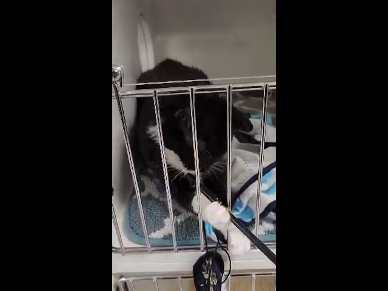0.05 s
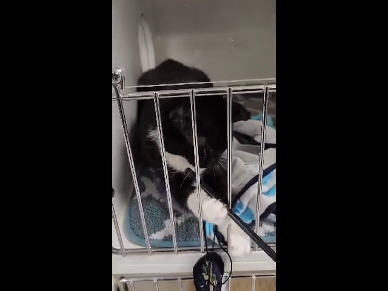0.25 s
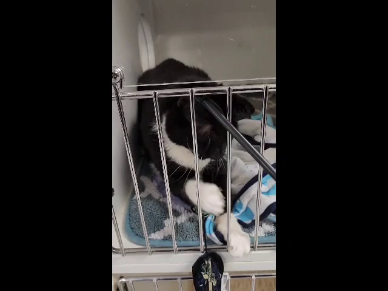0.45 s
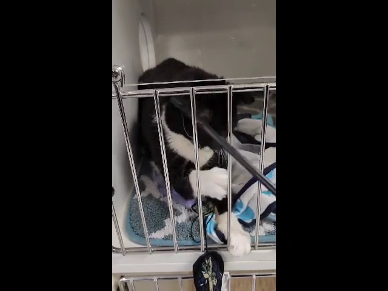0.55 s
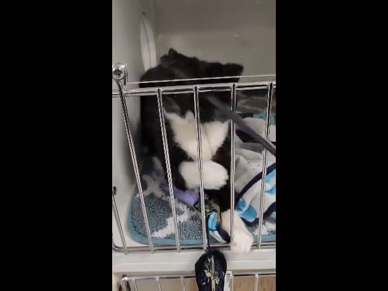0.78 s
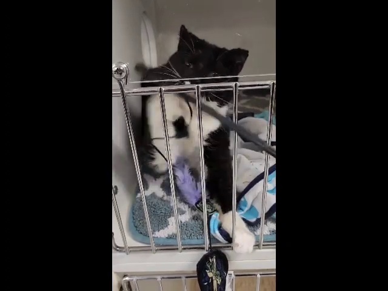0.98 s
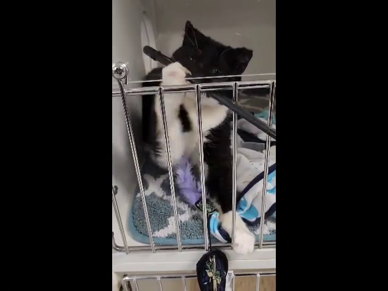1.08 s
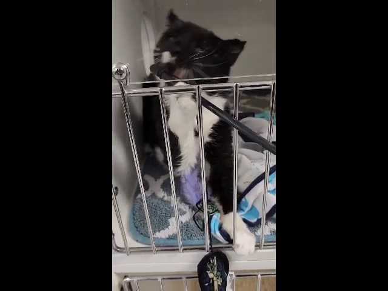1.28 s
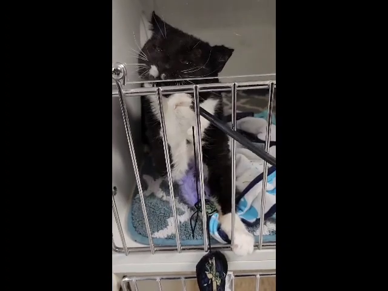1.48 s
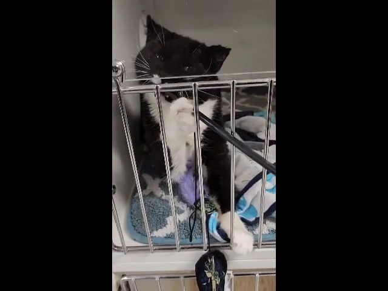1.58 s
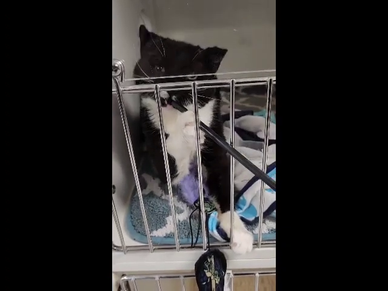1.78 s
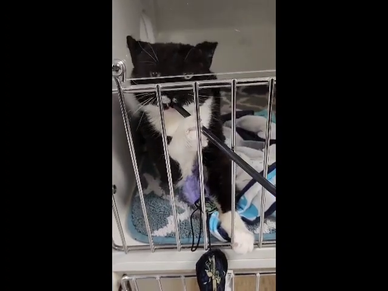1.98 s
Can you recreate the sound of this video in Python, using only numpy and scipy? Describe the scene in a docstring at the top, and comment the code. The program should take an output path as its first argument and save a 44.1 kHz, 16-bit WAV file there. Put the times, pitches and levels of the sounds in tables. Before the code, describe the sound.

Close to the microphone, wire cage bars rattle and ring as a cat tugs a plastic stick against them. The sharp knocks give way to faint rubbing and light ticks, over a steady low hum in a small room.

```python
"""A small room with a wire cat cage, the stereo microphone close to the cage door.
A cat tugs at a plastic wand that knocks against the door. Each knock is a crack, a short clatter of
the wire grid, a clack of the wand, ringing bars and a thump of the door, with the room behind it.
Soft scuffs and bites follow, over the steady low hum of ventilation."""
import sys
import numpy as np
from scipy import signal
from scipy.fft import rfft, irfft, next_fast_len
from scipy.io import wavfile

SR = 44100
rng = np.random.default_rng(int(sys.argv[2]) if len(sys.argv) > 2 else 0)


def to_wav(sig):
    """Store sig (one row per channel, or 1-D mono) as 16-bit WAV at the path in sys.argv[1].

    Samples outside -1..1 are clipped; the rate is SR.
    """
    pcm = np.clip(np.atleast_2d(sig), -1, 1) * 32767
    pcm = np.round(pcm).astype(np.int16)
    wavfile.write(sys.argv[1], SR, pcm.T)  # frames by channels


N = 90404
T = np.arange(N) / SR
FREQS = np.maximum(np.fft.rfftfreq(2 * next_fast_len(N), 1 / SR), 1)
PAN = np.array([[.5], [-.5]])  # shares a left-minus-right level between the channels
CRACK_DECAY_S = 0.0013


def undb(db):
    """Decibels to gain."""
    return 10 ** (np.asarray(db) / 20)


def curve(points, hz):
    """Read (hz, value) points on a log-frequency axis."""
    points = np.array(points, float)
    return np.interp(np.log(hz), np.log(points[:, 0]), points[:, 1])


def glide(values, position):
    """Straight lines between values spaced one step apart."""
    return np.interp(position, np.arange(len(values)), values)


def colour(x, gain_db):
    """Causal filter with a gain for each of FREQS."""
    half = len(FREQS) - 1
    cepstrum = irfft(np.log(undb(gain_db)))
    cepstrum[..., 1:half] *= 2
    cepstrum[..., half + 1:] = 0
    return irfft(rfft(x, 2 * half) * np.exp(rfft(cepstrum)))[..., :N]


def tone(low_db, mids_db, bright_db, top_db):
    """Colour of one contact against its level at 4 kHz."""
    return curve([(800, low_db), (1700, mids_db), (4000, 0), (7000, bright_db), (11000, top_db)], FREQS)


def resonance(hz, peak_db, half_width_oct):
    """One peak, in dB for each of FREQS."""
    return peak_db / (1 + (np.log2(FREQS / hz) / half_width_oct) ** 2)


def noise():
    """Unrelated white noise, left and right."""
    return rng.standard_normal((2, N))


def fade(t60_s):
    """Exponential die-away."""
    return np.exp(-np.log(1000) * T / t60_s)


def add(out, x, start_s):
    """Mix x into out from a start time."""
    i = int(max(start_s, 0) * SR)
    out[..., i:] += x[..., :N - i]


def wash(decays, bands=10, build_cycles=2.3):
    """Countless close resonances: each band of noise builds and dies at its own rate, the lows late."""
    centres, spectrum = np.geomspace(150, 15000, bands), rfft(noise())
    log_hz = np.log(np.maximum(np.fft.rfftfreq(N, 1 / SR), 1))
    out = np.zeros((2, N))
    for hz, weights in zip(centres, np.eye(bands)):
        band = irfft(spectrum * np.interp(log_hz, np.log(centres), weights), N)
        out += band * fade(curve(decays, hz)) * (1 - np.exp(-T * hz / build_cycles))
    return out


def ring(modes, scatter_db=3, detune_hz=3.61, waver_depth=0.37, waver_hz=60.55, unrelated_hz=1540):
    """Each place of contact weights the modes differently; loose parts shake, so they waver and fade."""
    out, t = np.zeros((2, N)), T[:SR]
    for hz, level_db, t60_s in modes:
        # low modes reach both channels nearly in phase
        turns = rng.random() + min(hz / unrelated_hz, 1) * rng.random((2, 1))
        size = undb(level_db + scatter_db * rng.standard_normal((2, 1))) * np.exp(2j * np.pi * turns)
        pitch_hz = hz + detune_hz * rng.uniform(-1.09, 1)
        steps = rng.standard_normal((200, 2)) @ np.array([1, 1j])
        waver = (1 + waver_depth * glide(steps, t * waver_hz)) / np.hypot(1, waver_depth)
        out[:, :SR] += (size * waver * np.exp((2j * np.pi * pitch_hz - np.log(1000) / t60_s) * t)).imag
    return out


# spectrum of the moving air: freq_hz, relative_db
AIR_COLOUR = [(12, -43.5), (20, -16.5), (59, 1.5), (84, -2.5), (108, -17.5), (151, -7), (217, -6),
              (278, -21.5), (310, -13), (337, -23), (421, -27.5), (733, -45), (914, -45.5), (1510, -52.5),
              (2160, -52.5), (4950, -66.5), (6010, -70), (7510, -64.5), (15000, -88)]
# its stereo width: freq_hz, side_minus_mid_db
AIR_WIDTH = [(30, -18), (150, -18), (300, -10.5), (600, -1), (4000, 2.5)]
# hum lines: pitch_hz, level_db
HUM_LINES = [(54, -54), (76, -54.5), (178, -56.5)]
def ventilation(air_db=-41.5, waver_depth=0.71, waver_hz=5.7):
    """Room tone: a low rush of air with wavering hum lines, nearly the same left and right."""
    mid, side = colour(noise(), curve(AIR_COLOUR, FREQS))
    side = colour(side, curve(AIR_WIDTH, FREQS))
    air = np.array([mid + side, mid - side]) * undb(air_db) / mid.std()
    for hz, level_db in HUM_LINES:
        real, imag = rng.standard_normal((2, 100))
        waver = 1 + waver_depth * glide(real + 1j * imag, T * waver_hz)
        air += undb(level_db) * np.sqrt(2) * (waver * np.exp(2j * np.pi * hz * T)).imag
    return air


# die-away of the room: freq_hz, t60_s
ROOM_DECAY = [(200, 0.34), (1200, 0.93), (4000, 0.32), (7500, 0.47), (10000, 0.12), (15000, .21)]
# colour of its reflections: freq_hz, gain_db
ROOM_TONE = [(200, -4.5), (550, 4), (1000, -10), (2500, 0), (4000, -3), (6000, 1.5), (8000, 5),
             (13000, 2.5)]
def room_reverb(relative_db=-12.5, build_s=0.0063):
    """The walls answer a knock, quieter than the cage close by."""
    reflections = colour(wash(ROOM_DECAY), relative_db + curve(ROOM_TONE, FREQS))
    return reflections * (1 - np.exp(-T / build_s))


def frame_flex(peak_s=.603, pitch_hz=388, level_db=-34, width_s=0.011):
    """The door frame drones briefly as it flexes."""
    swell = np.exp(-((T - peak_s) / width_s) ** 2)
    return undb(level_db) * swell * np.sin(2 * np.pi * pitch_hz * T)


# modes of the door frame: pitch_hz, relative_db, t60_s
FRAME_MODES = [(305.5, -16, 0.38), (334.3, -22.5, 0.76), (377.3, -20, 0.76), (414.3, -25.5, 2.2),
               (606, -26, 0.34)]
def frame_ring():
    """The struck door's frame rings low."""
    return ring(FRAME_MODES)


# modes of the bars: pitch_hz, relative_db, t60_s
BAR_MODES = [(708, -24, .35), (1100, -22.5, .5), (1120, -21, .6), (1134, -23, .65), (1152, -24, .65),
             (2255, -23.5, .68), (2990, -25, .3), (3073, -26, .3), (3545, -20, .36), (3612, -23, .4),
             (3715, -21, .46), (3751, -17.5, .48), (5400, -26, .48), (5470, -25, .44), (5600, -24, .42),
             (5695, -25.5, .3), (6002, -22.5, .42), (6160, -24, .2), (6320, -25, .2), (6630, -25.5, .4),
             (7512, -20, .3), (7604, -20.5, .3), (10050, -33, .24), (11400, -32, .22), (12690, -30, .24),
             (13530, -29.5, .19)]
def bar_ring(lowest=None):
    """The bars ring on, in all their modes or only the lowest few."""
    return ring(BAR_MODES[:lowest])


# modes of the wand: pitch_hz, relative_db, t60_s
WAND_MODES = [(1540, -22, .14), (1775, -19, .16), (1868, -14.5, .19), (5045, -17, .14)]
def wand_clack(lowest=None):
    """The plastic wand rings briefly, in all its modes or only the lowest few."""
    return ring(WAND_MODES[:lowest])


# modes of one wire: pitch_hz, relative_db, t60_s
WIRE_MODES = [(3850, -14, .1), (3990, -13, .12), (4231, -15, .15), (4360, -17, .2), (4643, -14, .12),
              (4810, -17, .1)]
def wire_clink():
    """A directly struck wire gives a short, high clink."""
    return ring(WIRE_MODES)


# rubbing strokes: start_s, level_db, rise_s, decay_s, mids_db, top_db, ring_db (last three relative)
SCUFF_STROKES = [(0.0, -57, 0.0026, 0.041, -16, -7, -4), (0.215, -61.5, 0.093, 0.75, -3, 1, -5),
                 (1.315, -46.5, 0.0072, 0.042, 2, 8, -19), (1.427, -70, 0.0095, 0.021, 7, -16, 28),
                 (1.492, -55.5, .004, 0.01, 7, -2.5, -12.5), (1.571, -60.5, 0.0063, 0.092, -1.5, -6.5, -16),
                 (1.632, -58.5, 0.008, 0.015, 4.5, -11.5, -7),
                 (1.876, -62.5, 0.0048, 0.023, 10.5, -13, -11)]
# spectrum of the rubbing: freq_hz, gain_db
RUB_COLOUR = [(200, -4.5), (600, 7.5), (1300, 1), (2500, 0), (3800, -2.5), (5000, -2.5), (7200, 2),
              (10000, -15.5), (15000, -21.5)]
def scuffs(grain_db=1.5, grain_samples=40):
    """Grainy rubbing strokes, the first ones a faint rustle of fabric, each stirring the wand and the bars."""
    out = np.zeros((2, N))
    for start_s, level_db, rise_s, decay_s, mids_db, top_db, ring_db in SCUFF_STROKES:
        sizes = undb(grain_db * rng.standard_normal(N // grain_samples + 1))
        grains = np.repeat(sizes, grain_samples)[:N]
        swell = np.minimum(T / rise_s, 1)
        decay = np.exp(-np.maximum(T - rise_s, 0) / decay_s)
        stroke = noise() * swell * decay * grains / np.sqrt(np.mean(grains ** 2))
        rub = colour(stroke, curve(RUB_COLOUR, FREQS) + tone(mids_db, mids_db, 0, top_db))
        ringing = undb(ring_db) * swell * (wand_clack(lowest=3) + bar_ring(lowest=5))
        add(out, undb(level_db) * (rub + ringing), start_s)
    return out


# spectrum of a tooth on plastic: freq_hz, gain_db
TOOTH_COLOUR = [(600, 0), (1800, 2), (2800, -6), (4000, -3), (5300, -9), (6200, 1), (7000, 4), (7800, -5),
                (9500, -18), (15000, -19)]
def bite(start_s=1.7312, clack_db=-41.5, damp_s=.012, tick_db=-44):
    """A tooth ticks on the wand, whose ring the jaws damp at once."""
    out = np.zeros((2, N))
    clack = undb(clack_db) * wand_clack(lowest=3) * np.exp(-T / damp_s)
    tick = colour(noise() * np.exp(-T / CRACK_DECAY_S), tick_db + curve(TOOTH_COLOUR, FREQS))
    add(out, clack + tick, start_s)
    return out


def door_thump(pitch_hz=145.7, relative_db=-6.5, t60_s=0.25, build_s=0.0049):
    """The whole door shakes in one low mode."""
    envelope = fade(t60_s) * (1 - np.exp(-T / build_s))
    return undb(relative_db) * envelope * np.sin(2 * np.pi * pitch_hz * T)


# die-away of the cage: freq_hz, t60_s
CAGE_DECAY = [(200, 0.57), (1500, 0.17), (5000, 0.19), (13000, 0.1)]
def cage_vibrations():
    """Two independent ways in which the struck cage shakes."""
    return wash(CAGE_DECAY), wash(CAGE_DECAY)


def clatter(cage, rattle_db=3.5, rattle_step_s=.0015):
    """The place struck blends the cage's two vibrations; wires chatter in their joints."""
    place = 2 * np.pi * rng.random()
    rattle = glide(undb(rattle_db * rng.standard_normal(2000)), T / rattle_step_s)
    rattle /= np.sqrt(np.mean(rattle ** 2))
    return rattle * (np.cos(place) * cage[0] + np.sin(place) * cage[1])


# broad spectrum of the wire grid: freq_hz, gain_db
GRID_COLOUR = [(100, -12), (300, 3), (520, -1.5), (800, 3), (1300, -2), (1800, 1.5), (2650, -3),
               (3900, 7.5), (5300, 0), (7400, 4), (8400, -4.5), (10200, -9), (13000, -7.5), (15000, -13.5),
               (16500, -29)]
def grid_response(ripple_db=2, spacing_hz=60.06):
    """The grid's colour, rippled by its many small resonances, in dB for each of FREQS."""
    return curve(GRID_COLOUR, FREQS) + ripple_db * glide(rng.standard_normal(2000), FREQS / spacing_hz)


# colour of the crack against the clatter: freq_hz, gain_db
CRACK_TONE = [(300, -11.5), (900, -4.5), (2000, -1), (5000, 0.5), (7500, 0), (14000, 1.5)]
def crack(gain_db, base_db=0.5, spread=0.91, tick_db=4.5, tick_s=.00015):
    """The instant of contact: a burst of noise with a hard first touch at its front."""
    hiss = rng.standard_normal(N) + spread * noise()
    envelope = np.exp(-T / CRACK_DECAY_S) + undb(tick_db) * np.exp(-T / tick_s)
    return colour(hiss * envelope, base_db + gain_db + curve(CRACK_TONE, FREQS))


def graze(strike_s, relative_db=-15, width_s=0.0051):
    """The wand slides on the bar: friction noise that peaks as it strikes."""
    return undb(relative_db) * noise() * np.exp(-abs(T - strike_s) / width_s)


# stereo image of the door: freq_hz, left_minus_right_db
DOOR_BALANCE = [(150, 2.5), (300, -4.5), (600, 0), (1100, 2.5), (2000, -1), (4000, -3.5), (8000, -4),
                (13000, -3)]
def door_to_microphone(sound, right_lag_s=.00026):
    """Each band of the nearby door leans to its own side, and the right channel hears it later."""
    left, right = colour(sound, curve(DOOR_BALANCE, FREQS) * PAN)
    return np.array([left, np.roll(right, int(right_lag_s * SR))])


# wand strikes close to the microphone, the last two rows only faint ticks within the scuffing: start_s,
# level_db, # then relative: low_db, mids_db, bright_db, top_db, thump_db, ring_db, wand_db, clink_db, crack_db,
# pan_db, # then the two resonances of the place struck: hollow_hz, hollow_db, wire_hz, wire_db
STRIKES = [(0.4144, -46.5, 8, 16.5, 5.5, 7, 13, 4, 3.5, 7, 2, 2.5, 1800, -1.5, 4000, 9),
           (0.4472, -23.5, -3, -3.5, 4, 3.5, -1.5, 5, -21, -15, 1.5, -0.5, 1110, 5, 3170, 8.2),
           (0.456, -26, 1, 0.5, -2.5, 5.5, -8, 0, -18, -13, -16, 7.5, 600, 1, 7600, 7),
           (0.4971, -28.5, -1.5, 6, -0.5, 2, -7, 6.5, -0.5, 6.5, 8, 4, 1110, -3.5, 5950, 11),
           (0.5048, -35.5, -2, -3, 0, -8, -9.5, 2, 13, 5, 7.5, -2.5, 310, 8.5, 5050, 12.3),
           (0.6477, -34, -3.5, -7, -2, -5.5, -14, 7, -3.5, -11, 8, 1.5, 1120, 3.5, 4145, 2.7),
           (0.7396, -27.5, 3.5, -1.5, -2, 3, 1, -1, -2.5, 9, 4.5, 2, 750, -1.5, 4445, 3.9),
           (0.8985, -40, 3, 2.5, 2.5, 4, -2.5, 3, -3, -3, 5.5, 1.5, 1560, 9, 4160, 4.2),
           (0.9638, -52, -9, 3, -10.5, 2.5, -16, 18, -4.5, -15.5, -2, -8, 1800, -0.5, 6800, 4),
           (0.9880, -26, -1.5, 2, 3, 7, 9.5, 1, 9, 4, 3, 3, 1730, 7, 5250, 6.5),
           (1.1070, -21, -1, 4, -0.5, 5, 5.5, -3.5, -7, 3.5, 1.5, 1, 740, 6.5, 6720, 7.5),
           (1.1260, -28, 2.5, -5.5, 3.5, 8, 6, 3, 3.5, -3.5, -2, 3.5, 1320, 8, 3670, 9.9),
           (1.423, -62, 12.5, 17, -18, -23, -10.5, 2, 10.5, -10, 4.5, -0.5, 1148, 14.5, 2890, 5.2),
           (1.488, -57, 6.5, 5, 1.5, 6, -8.5, -8, 4.5, -7, 4, 0.5, 2506, 11, 7380, 3.4),
           (1.636, -63.5, 13, 3, 2, -8, -1, -7, -5.5, 4, -2, 1, 1300, 9.5, 3460, 6),
           (1.878, -66.5, 14, 2.5, 1, -12.5, -2, -9, -9.5, -0.5, -0.5, 1.5, 600, 8, 3400, 3.4)]
def knocks(bars_base_db=-4, wand_base_db=1, clink_base_db=-0.5):
    """Each knock grazes, cracks, rattles the cage, rings bars and wand and shakes the door."""
    out, door = np.zeros((2, N)), np.zeros(N)
    room, cage, grid_db, thump = room_reverb(), cage_vibrations(), grid_response(), door_thump()
    for (start_s, level_db, low_db, mids_db, bright_db, top_db, thump_db, ring_db, wand_db, clink_db,
         crack_db, pan_db, hollow_hz, hollow_db, wire_hz, wire_db) in STRIKES:
        contact = graze(start_s)
        add(contact, crack(crack_db) + clatter(cage) + room, start_s)
        hollow_peak = resonance(hollow_hz, hollow_db, half_width_oct=0.2)
        wire_peak = resonance(wire_hz, wire_db, half_width_oct=0.086)
        hit = colour(contact, grid_db + hollow_peak + wire_peak + tone(low_db, mids_db, bright_db, top_db))
        ringing = undb(bars_base_db + ring_db) * (frame_ring() + bar_ring())
        clack = undb(wand_base_db + wand_db) * wand_clack()
        clink = undb(clink_base_db + clink_db) * wire_clink()
        add(hit, ringing + clack + clink, start_s)
        out += hit * undb(level_db + pan_db * PAN)
        add(door, undb(level_db + thump_db) * thump, start_s)
    return door_to_microphone(out + door)


def scene():
    """The cat and its wand at the cage door, in a humming room."""
    return ventilation() + knocks() + frame_flex() + scuffs() + bite()


def record(dry):
    """The recorder cuts the top above 16 kHz."""
    return signal.sosfilt(signal.ellip(8, .2, 70, 16000, fs=SR, output="sos"), dry)


dry = scene()
out = record(dry)
to_wav(out)
```